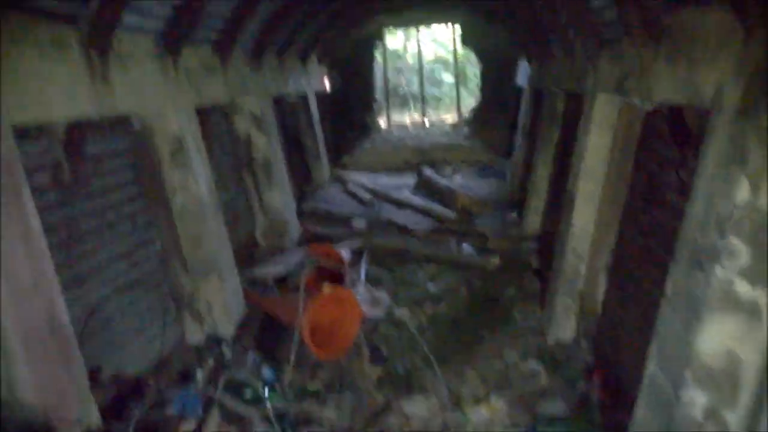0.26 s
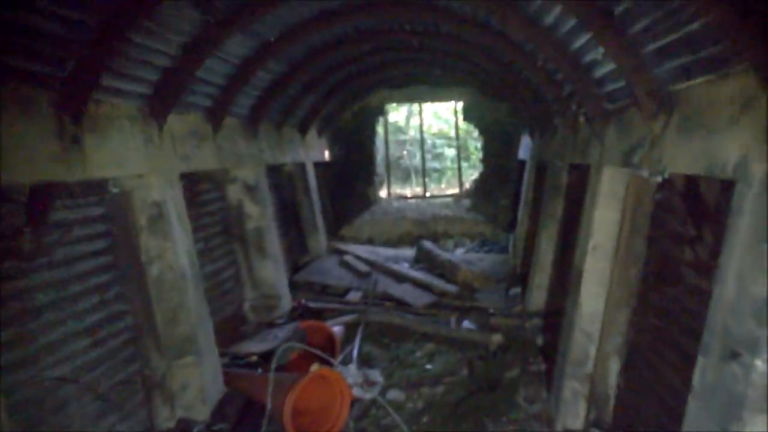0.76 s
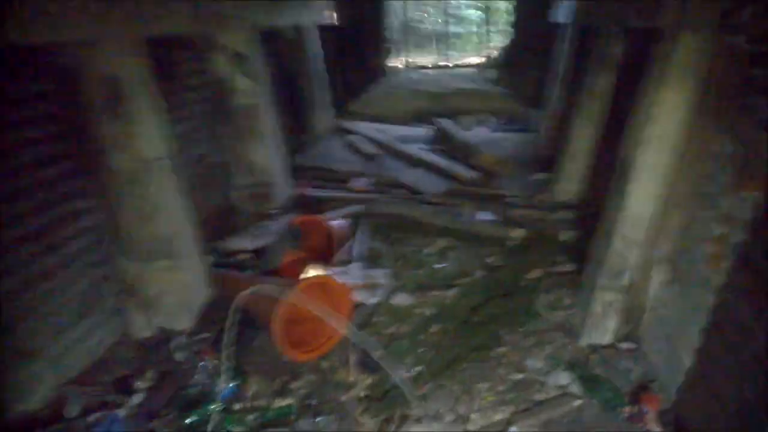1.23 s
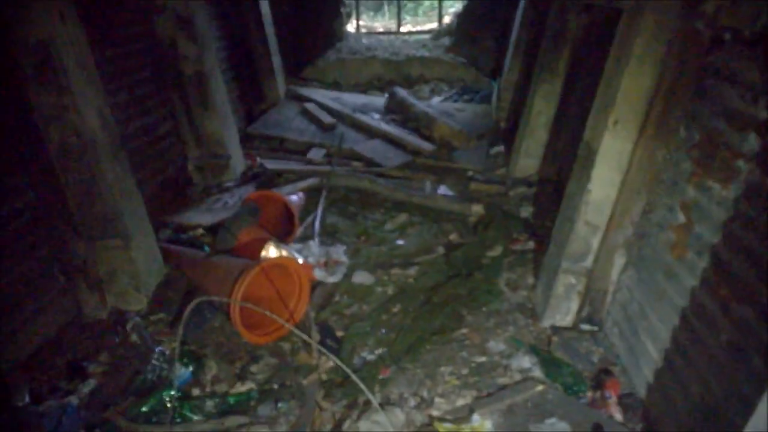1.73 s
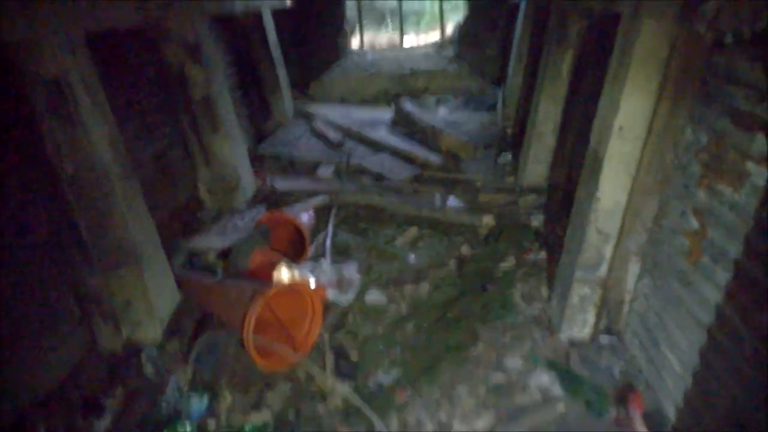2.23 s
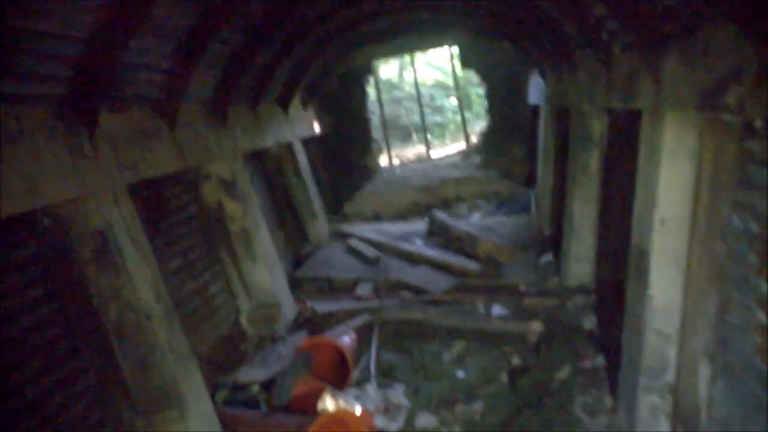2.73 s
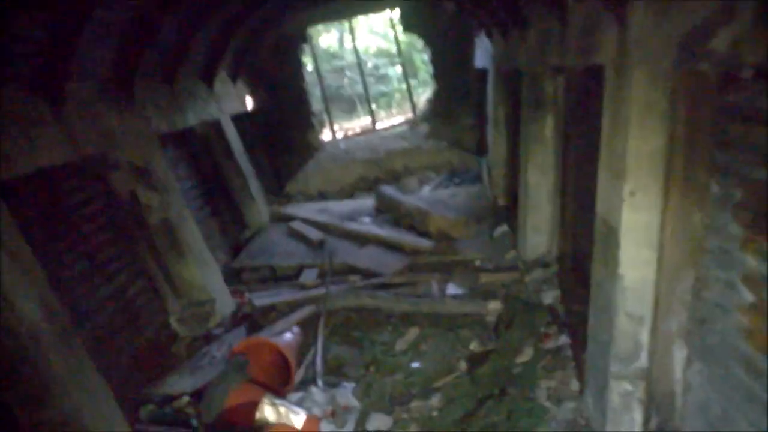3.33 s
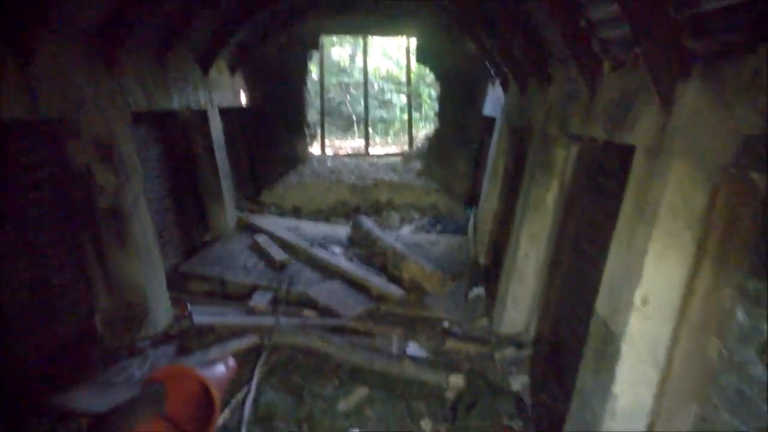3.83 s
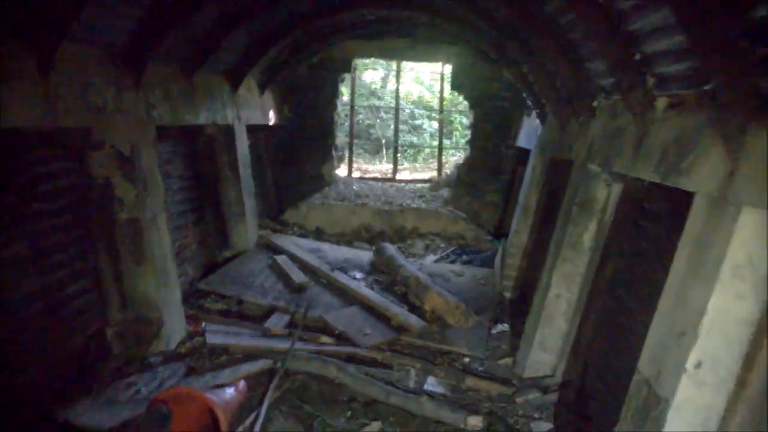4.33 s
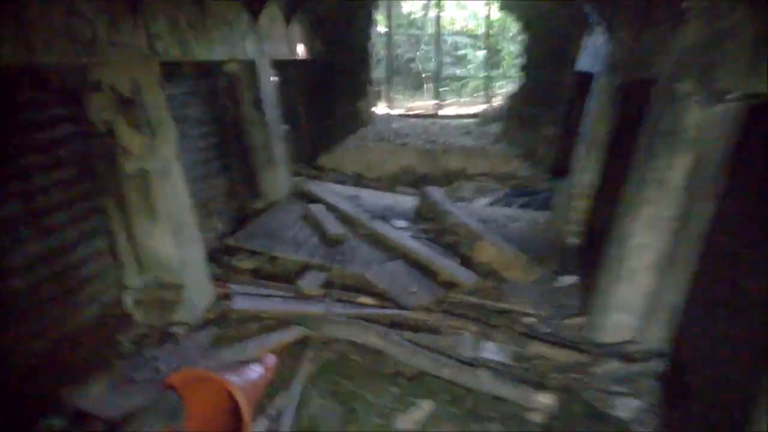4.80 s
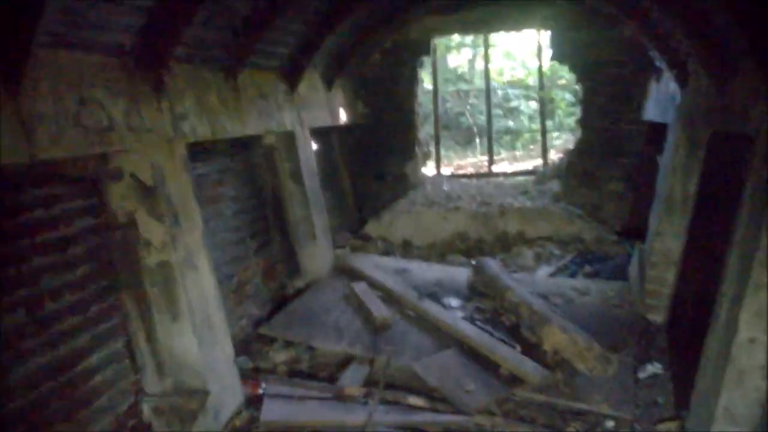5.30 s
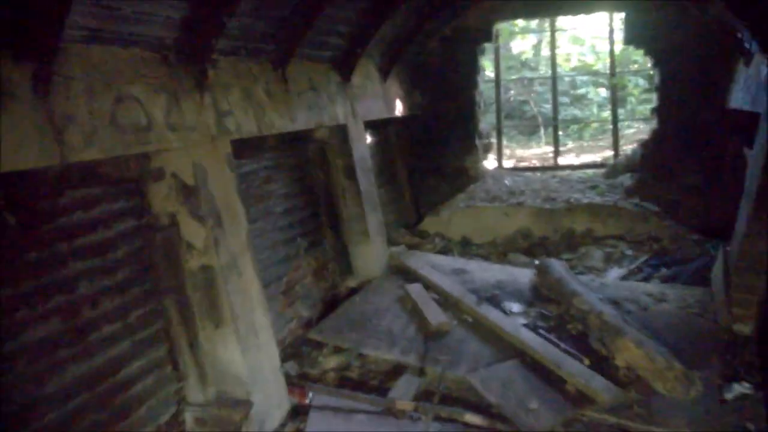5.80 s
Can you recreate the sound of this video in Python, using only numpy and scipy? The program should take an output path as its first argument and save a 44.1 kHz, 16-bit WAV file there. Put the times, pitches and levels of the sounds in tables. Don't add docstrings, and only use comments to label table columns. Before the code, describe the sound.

Close to a hand-held camera, someone walks slowly over broken glass and rubble in a concrete tunnel. A light shift leads to a grinding crunch with snapping shards and knocking stones. After a quiet shuffle comes a duller, stonier crunch, then a loud, bright glass break and a gritty drag. Small pieces settle. Short, scattered echoes follow, over soft air, low rumble and faint hiss.

```python
import sys
import numpy as np
from scipy import signal
from scipy.fft import rfft, irfft, next_fast_len
from scipy.io import wavfile
from scipy.ndimage import uniform_filter1d

SR = 44100
rng = np.random.default_rng(int(sys.argv[2]) if len(sys.argv) > 2 else 0)


def transcribe(signal):
    frames = np.atleast_2d(signal).T
    limited = np.clip(frames, -1, 1)
    pcm = np.round(limited * 32767).astype(np.int16)
    wavfile.write(sys.argv[1], SR, pcm)


def how_loud(loudness_db):
    steps = np.asarray(loudness_db, float) / 20
    return 10 ** steps


N = 266981


def evened(x):
    return x / np.sqrt(np.mean(x ** 2) + 1e-20)


def read(points, hz):
    f, value = np.transpose(points)
    return np.interp(np.log(hz + 1), np.log(f + 1), value)


def add(mix, s, sound):
    part = mix[round(s * SR):][:len(sound)]
    part += sound[:len(part)]


def coloured(spectrum, patchy_db, size):
    frames, hz = 4 * N // size + 5, np.fft.rfftfreq(size, 1 / SR)
    real, imaginary, patches = rng.standard_normal((3, frames, len(hz))).transpose(0, 2, 1)
    patches = uniform_filter1d(patches, size=14, axis=0)
    patches = evened(uniform_filter1d(patches, size=10, axis=1))
    level = how_loud(read(spectrum, hz)[:, None] + patchy_db * patches)
    z = (real + 1j * imaginary) * level
    return evened(signal.istft(z, nperseg=size, noverlap=3 * size // 4)[1][:N])


def background():
    # (f/Hz, level/dB per Hz)
    air_colour = [(65, -14), (110, -25), (217, -19), (256, -2), (386, -27), (533, 2), (594, -9),
                  (1150, -5.5), (8000, -23), (10400, -37), (17600, -120)]
    # (f/Hz, level/dB per Hz)
    rumble_colour = [(7.1, -14), (12, -17), (33, 0), (49, 0.5), (62, -1.5), (76, -12), (88, -5.5),
                     (103, -17), (160, -21), (210, -20), (350, -120)]
    # (t/s, level/dB)
    rumble_level = [(0, -56), (.2, -60), (.45, -57), (1.0, -54), (1.6, -59), (2.7, -60), (3.3, -56),
                    (3.7, -56), (4.2, -59), (4.8, -56), (5.2, -55), (5.6, -56), (6.05, -56)]
    # (f/Hz, level/dB per Hz)
    hiss_colour = [(100, -37), (3000, 12.5), (9000, 2), (12500, 6.5), (16000, 7)]
    s, db = np.transpose(rumble_level)
    rumble = coloured(rumble_colour, patchy_db=1.5, size=4096)
    rumble *= how_loud(np.interp(np.arange(N) / SR, s, db))
    hiss = how_loud(-73) * coloured(hiss_colour, patchy_db=.3, size=512)
    air = how_loud(-71) * coloured(air_colour, patchy_db=1.0, size=512)
    return rumble + hiss + air


def vault(sends):
    # (f/Hz, time to fall 60 dB/s)
    echo_time = [(150, 1), (500, 0.19), (2000, 0.12), (5000, 0.28), (15000, 0.16)]
    rise_s, open_s = .014, .052
    taps = np.zeros((len(sends), SR // 2))
    grid = np.arange(60, SR // 2 - 8, 8)
    at = grid + rng.integers(0, 8, (len(sends), len(grid)))
    np.put_along_axis(taps, at, rng.choice([-1., 1.], at.shape), 1)
    hz, t, z = signal.stft(taps, SR, nperseg=128)
    fall_db = -60 * t / read(echo_time, hz)[:, None]
    tail = signal.istft(z * how_loud(fall_db), SR, nperseg=128)[1]
    t = np.arange(tail.shape[1]) / SR
    tail *= .4 + 1 - np.exp(-(t / rise_s) ** 2)
    tail *= 0.73 + np.exp(-(t / open_s) ** 3)
    tail /= np.linalg.norm(tail, axis=1, keepdims=True)
    return signal.fftconvolve(sends, tail, axes=1)[:, :N].sum(0)


def rings(hz, t60, modes, rise_s):
    t = np.arange(int(np.clip(1.3 * t60, .006, .12) * SR)) / SR
    out = np.zeros(len(t))
    for (ratio, db), phase in zip(modes, rng.random(len(modes))):
        fade = how_loud(db - 60 * t * np.sqrt(ratio) / max(t60, .002))
        out += fade * np.sin(2 * np.pi * (min(hz * ratio, .4 * SR) * t + phase))
    out *= 1 - np.exp(-(t / rise_s) ** 1.6)
    return out / abs(out).max()


def snap(db, hz, crack_db):
    # (ratio to its main note, level/dB)
    shard_notes = [(1.0, 0.0), (1.3, -4.0), (1.75, -13.0), (.76, -5.0)]
    ring = rings(hz, 9.4 / hz, shard_notes, 0.00022)
    t = np.arange(232) / SR
    burst = rfft((rng.random(232) - .5) * np.exp(-t / .0006))
    even_burst = irfft(burst / abs(burst))
    crack = signal.lfilter([1, -.7], [1], even_burst) * np.exp(-t / 0.02)
    ring[:len(crack)] += how_loud(crack_db + 11.5) * crack / abs(crack).max()
    return how_loud(db) * ring / abs(ring).max()


def load(steps):
    # (peak t/s, level/dB at fineness step 0, rise/s, fall/s,
    # fineness/dB per step)
    sole_loads = [(0.832, -41.5, 0.061, 0.13, 0), (.895, -46.5, 0.072, 0.059, -1),
                  (0.966, -60, 0.0052, 0.35, -2), (1.028, -43, 0.081, 0.097, -1.5),
                  (1.114, -37.5, 0.055, 0.16, -2.5), (1.193, -34, 0.046, 0.1, 0.5),
                  (1.235, -36.5, 0.059, 0.098, 0.5), (1.289, -44.5, 0.067, 0.14, -7),
                  (1.356, -61.5, 0.06, 1, -3), (2.804, -50.5, 0.0046, 0.093, 0),
                  (3.345, -45.5, 0.12, 0.094, 0.5), (3.43, -49.5, 0.068, 0.24, 0),
                  (3.552, -37.5, 0.064, 0.1, -1.5), (3.579, -34, 0.0068, 0.099, -1),
                  (3.64, -51, 0.033, 0.046, 0), (4.446, -46, 0.038, .05, -5.5), (4.464, -43, 0.011, 0.11, 0),
                  (4.611, -39, 0.015, 0.1, -5.5), (4.644, -35, 0.031, 0.07, 0.5),
                  (4.671, -32, 0.0057, 0.085, 0), (4.861, -42, 0.0069, 0.15, 0), (4.892, -42, .015, 0.2, 0.5),
                  (5.2105, -44, 0.0018, 0.08, 4), (5.222, -54, 0.025, 0.09, 5.5),
                  (.03, -56.5, 0.98, 0.26, -6), (.224, -61, 0.12, 0.56, -1.5), (.366, -59, 0.28, 0.49, -1.5),
                (.538, -65.5, 0.0047, 0.15, -3), (.72, -60, 0.3, 0.082, -1.5),
                (1.58, -70, 0.18, 0.079, 0.5), (1.781, -51, 0.0052, 0.033, -4),
                (1.906, -50.5, 0.048, 0.033, -2), (2.066, -64.5, 0.013, 0.097, 1),
                (2.34, -61, 0.24, 0.035, -3.5), (2.53, -58.5, 0.062, 0.048, 0.5), (2.65, -64, .01, 0.12, 1),
                (2.739, -61, 0.0098, 0.025, 1), (3.862, -60.5, 0.083, 0.061, -0.5),
                (4.122, -55, 0.1, 0.036, -2), (4.2, -62.5, 0.056, 0.99, -1),
                (4.4, -58.5, 0.073, 0.075, -0.5), (5.18, -62, 0.052, 0.064, 0.5),
                (2.055, -65, 0.052, .01, -0.5), (5.382, -72, 0.016, 0.18, -24),
                (5.439, -49.5, 0.1, 0.09, -4), (5.475, -61, 0.069, 0.023, 2),
                (5.545, -62, 0.049, 0.063, 4.5), (5.638, -54.5, 0.1, 0.014, -2),
                (5.855, -55, 0.34, 0.25, -4.5), (5.899, -59.5, 0.055, 0.14, 2.5),
                  (2.456, -61, 0.18, 0.2, -0.5),
        (2.958, -47, 0.054, 0.3, 0.5),
        (3.06, -48.5, 0.57, 0.21, -1),
        (3.27, -47, 0.24, 1, -1),
        (4.983, -38, 0.25, 0.17, -1),
        (5.071, -60, 0.07, 0.089, 4.5),
    ]
    s, db, rise, fall, fine = np.transpose(sole_loads)[:, :, None]
    t = np.arange(0, N / SR + .002, .001)
    away = abs(t - s) / np.maximum(np.where(t < s, rise, fall), .002)
    rubble_loss_db = (steps < 0) * 1.5 * np.maximum(fine, 0)
    each_db = db + steps * fine - rubble_loss_db - 25.5 * away ** 0.99
    level = np.sqrt((how_loud(each_db) ** 2).sum(0))
    return np.interp(np.arange(N) / SR, t, level)


def resonate(x, hz, width):
    turn = np.exp(2j * np.pi * np.cumsum(hz) / SR)
    r = np.exp(-np.pi * width / SR)
    return 2 * (turn * signal.lfilter([1 - r], [1, -r], x / turn)).real


def skids():
    # (start t/s, length/s, level/dB, first f/Hz, last f/Hz)
    slides = [(0.868, 0.063, -57, 2100, 2300), (0.964, 0.085, -57, 2400, 2200),
              (1.018, 0.19, -50, 2090, 2290), (1.04, 0.038, -56, 4600, 4800),
              (1.096, 0.035, -44.5, 1300, 1390), (1.26, 0.056, -56, 11000, 9000),
              (1.294, 0.044, -51.5, 3240, 3280), (1.566, 0.074, -67, 5000, 3500),
              (1.78, 0.052, -65, 480, 480), (1.893, 0.095, -60, 1700, 1800), (1.89, 0.052, -57, 3600, 3400),
              (2.066, 0.062, -61.5, 2000, 2000), (2.439, 0.2, -61, 1110, 1120),
              (2.82, 0.043, -57, 3400, 3800), (2.814, 0.048, -54, 1090, 1000),
              (2.912, 0.06, -53.5, 4300, 4000), (2.96, 0.028, -67, 1900, 1900),
              (2.994, 0.046, -48, 1660, 1490), (3.325, 0.057, -49, 4020, 3750),
              (3.382, 0.093, -41.5, 242, 240), (3.847, 0.046, -58, 980, 1290),
              (4.097, 0.041, -52.5, 1920, 4100), (4.332, 0.018, -53.5, 800, 700),
              (4.374, 0.085, -57, 860, 750), (4.665, 0.084, -37.5, 3400, 3130),
              (4.683, 0.12, -50, 2310, 2360), (4.726, 0.053, -48, 900, 900),
              (4.841, 0.023, -55, 4500, 5500), (5.242, 0.056, -47.5, 7000, 5500),
              (5.382, 0.062, -62, 900, 695), (5.53, 0.15, -61.5, 990, 1000),
              (5.531, 0.045, -67, 3100, 3200), (5.623, 0.048, -52, 3860, 3870),
              (5.739, 0.094, -66, 2620, 2600), (5.786, 0.11, -55.5, 885, 950),
              (5.825, 0.073, -55.5, 1930, 2930), (5.89, 0.052, -49.5, 306, 304),
              (5.894, .05, -69, 2190, 2200), (.22, 0.34, -66.5, 1500, 2200),
              (2.296, 0.074, -62, 1100, 1100)]
    out = np.zeros(N)
    for s, length, db, first_hz, last_hz in slides:
        u = np.linspace(0, 1, int(np.clip(length * SR, 200, SR // 4)))
        draw, size, sign = rng.random((3, len(u)))
        struck = draw < 3000 / SR
        scratches = struck * how_loud(-5 * np.log(size + 0.013)) * np.sign(sign - .5)
        hz = first_hz * (last_hz / first_hz) ** u
        width = 0.51 * hz.mean()
        colour = evened(resonate(resonate(scratches, hz, width), hz, width))
        swell = np.sin(np.pi * u ** 0.93) ** .5
        add(out, s, colour * swell * how_loud(db - 12.5 * u ** 2))
    return out


def chips():
    # (t/s, peak level/dB, ring f/Hz, crack level/dB re peak)
    splits = [(.8007, -46, 1010, -18), (.829, -35, 3030, -9), (0.835, -38, 2000, -6),
              (1.0916, -38, 2460, -23), (1.1037, -29.5, 1190, -24), (1.213, -44.5, 3620, -20.5),
              (2.8147, -44, 1480, -8), (2.915, -51, 2000, -12), (2.9978, -49, 1780, -20),
              (3.269, -37, 1020, -25), (3.3285, -42, 4000, -9), (3.421, -45, 1510, -18),
              (3.595, -33, 910, -17), (4.3696, -46, 1314, -20), (4.845, -40, 2390, -24),
              (4.891, -28, 2270, -20), (5.211, -36, 2920, -3), (5.45, -39, 4970, -10),
              (3.852, -46, 1000, -20)]
    out = np.zeros(N)
    for s, db, hz, crack_db in splits:
        add(out, s, snap(db, hz, crack_db))
    return out


def slivers():
    # lowest f/Hz, highest f/Hz, cycles to die 60 dB, level/dB re load, size spread/dB
    lo_hz, hi_hz, cycles, share_db, spread_db = (1505, 9998, 86, -7.5, 1.5)
    when, note, size = rng.random((3000, 3)).T[:, :, None]
    at, t = (when * N).astype(int), np.arange(800) / SR
    hz = lo_hz * (hi_hz / lo_hz) ** note
    fade = how_loud(share_db - spread_db * np.log(size + 0.017) - 60 * t * hz / cycles)
    ring = load(steps=1)[at] * fade * np.sin(2 * np.pi * hz * t)
    return np.bincount((at + np.arange(len(t))).ravel(), ring.ravel(), N)[:N]


def loose():
    out = skids() + chips() + slivers()
    return out + how_loud(-15) * vault(out[None])


def fragments():
    # (t/s, peak level/dB, f/Hz, cycles to die 60 dB)
    pieces = [(.842, -45, 2000, 25), (.869, -49, 2100, 30), (1.000, -44, 2120, 40), (1.016, -40, 4760, 44),
              (1.144, -42, 4300, 60), (1.211, -33, 4480, 117), (1.221, -40, 4450, 100),
              (1.237, -32, 3200, 70), (1.284, -44, 4420, 60), (1.906, -41, 2460, 22),
              (2.078, -50, 3700, 70), (2.086, -55, 3750, 70), (2.735, -50, 3200, 25),
              (2.737, -59, 6500, 60), (2.925, -42, 1080, 20), (2.963, -45, 4480, 50),
              (2.965, -42.5, 340, 19), (3.068, -47, 463, 12), (3.268, -31, 524, 5), (3.316, -38, 527, 20),
              (3.556, -39, 2440, 30), (3.582, -26, 382, 7), (3.593, -30, 400, 5), (3.607, -35, 296, 5),
              (3.789, -49, 11600, 198), (3.804, -56, 574, 11), (4.378, -46.5, 340, 12),
              (4.466, -38.5, 1070, 33), (4.488, -43, 3620, 40), (4.611, -22.5, 713, 10),
              (4.645, -32, 6270, 55), (4.667, -24.5, 6700, 30), (4.667, -21.5, 4380, 15),
              (4.677, -28, 3250, 50), (4.711, -37, 390, 18), (4.73, -39, 3270, 50), (4.867, -34, 4820, 40),
              (4.890, -30, 2380, 15), (4.919, -43, 4820, 50), (4.96, -41, 540, 14), (4.995, -40.5, 460, 14),
              (5.015, -35, 1380, 25), (5.072, -40, 4700, 80), (5.208, -36, 2700, 20),
              (5.213, -36, 13400, 80), (5.219, -28, 13500, 100), (5.268, -46, 7440, 70),
              (5.447, -49, 1000, 8), (5.638, -42, 3930, 70), (5.826, -45, 900, 17)]
    out = np.zeros(N)
    for s, db, hz, cycles in pieces:
        add(out, s, how_loud(db) * rings(hz, cycles / hz, [(1.0, 2.5), (1.04, -4)], 0.82 / hz))
    return out + how_loud(-11.5) * vault(out[None])


def clinks():
    # (t/s, peak level/dB, f/Hz, time to fall 60 dB/s, vault level/dB)
    large_pieces = [(1.187, -26.5, 4480, 0.049, -2), (1.194, -24.5, 7190, 0.062, -13),
                    (1.205, -34, 3217, 0.045, 7.5), (1.8961, -51, 2480, 0.0071, 18),
                    (2.47, -55, 1020, 0.047, 1), (2.8, -54, 128, 0.093, -27), (3.3506, -40, 135, 0.02, 2),
                    (3.356, -28.5, 603, 0.026, -29), (4.5961, -41.5, 678, 0.058, 6),
                    (4.6085, -27.5, 712, 0.02, 3.5), (4.667, -22.5, 2143, 0.027, 0),
                    (4.67, -47.5, 104, 0.055, 0.5), (4.690, -31, 2326, 0.049, 0),
                    (4.777, -54, 3150, 0.052, -17), (4.860, -29.5, 2328, 0.054, 4),
                    (4.888, -33, 2303, 0.042, -21), (4.903, -41, 3570, 0.041, -16),
                    (5.427, -49, 2380, 0.017, 9), (5.808, -56, 895, .06, 3), (5.8221, -46, 860, 0.034, 0.5),
                    (5.884, -58.5, 193, 0.018, 11)]
    # (ratio to its main note, level/dB)
    piece_notes = [(1.0, 0.0), (1.07, -7.0), (2.75, -22.0)]
    return [(s, how_loud(db) * rings(hz, t60, piece_notes, 1.1 / hz), vault_db)
            for s, db, hz, t60, vault_db in large_pieces]


def knocks():
    # (t/s, peak level/dB, f/Hz, vault level/dB)
    stones = [(0.68, -53, 510, -12), (0.785, -43, 432, 2.5), (0.801, -34, 485, -0.5), (0.959, -39, 600, 3),
              (1.014, -35.5, 483, 1.5), (1.099, -33, 494, -5), (1.117, -38.5, 486, 9),
              (1.24, -36.5, 517, 5), (1.781, -55, 360, -14), (1.893, -55, 514, -17),
              (2.815, -44.5, 514, -6), (3.251, -33.5, 580, 0), (3.263, -31.5, 276, 3.5),
              (3.2959, -24, 550, -11), (3.353, -26.5, 1133, -4), (3.42, -23, 563, -2.5),
              (3.517, -35, 628, -2), (3.5485, -33.5, 590, 5.5), (3.578, -20.5, 339, -11.5),
              (3.609, -33, 293, -15), (3.849, -49, 969, 2), (4.3296, -44.5, 470, -1), (4.371, -50, 575, 7),
              (4.461, -32.5, 538, -2), (4.886, -29.5, 716, -17), (5.2053, -30.5, 1200, -5),
              (5.382, -53, 1010, -21), (5.404, -52, 510, -1), (5.528, -46.5, 860, -6),
              (5.621, -42.5, 1000, 0.5)]
    # (ratio to its main note, level/dB)
    stone_notes = [(1.0, 0.0), (.7, -9.0), (1.5, -9.0), (2.3, -14.0)]
    t60_s, rise_s = .014, .003
    return [(s, how_loud(db) * rings(hz, t60_s, stone_notes, rise_s), vault_db)
            for s, db, hz, vault_db in stones]


def snaps():
    # (t/s, peak level/dB, ring f/Hz, crack level/dB re peak, vault level/dB)
    shards = [(0.8129, -30.5, 1930, -2, 12), (0.9591, -34, 1760, -25, 9), (1.0956, -32, 1500, -29, 10.5),
              (1.7806, -49, 1620, -19, -3), (1.888, -41, 2100, -21, 10), (2.524, -49.5, 1880, -25, 10),
              (2.8998, -46.5, 1620, -31, 16.5), (2.95, -36.5, 1810, 7, 15), (3.2215, -39, 1140, -14, 13.5),
              (3.265, -28, 1280, -18, 3), (3.297, -36.5, 1380, -12, 10.5), (3.355, -30, 1480, -28, 5),
              (3.548, -29, 1200, -11, 5.5), (3.5793, -19, 1530, -19, 5), (4.1006, -42, 1830, -30, 5),
              (4.4436, -34.5, 1290, -32, 8), (4.4642, -37, 1660, -14, 16), (4.636, -20, 2250, -25, -11),
              (4.6668, -11.5, 2670, -24, -11), (4.86, -28, 2650, -37, 6.5), (4.887, -33, 2150, -27, -1),
              (4.978, -30, 1590, 0, 14), (5.407, -48, 1210, -6, -6), (5.443, -40.5, 2090, -5, 9.5)]
    # (t/s, peak level/dB, ring f/Hz, crack level/dB re peak, vault level/dB)
    splinters = [(1.0157, -32, 2100, -14, 7), (1.052, -37.5, 3240, -31, 9), (1.127, -28.5, 4100, -2, 10.5),
                 (1.1767, -27.5, 4440, -27, 9.5), (1.195, -30, 5600, -25, -1), (2.065, -39, 3270, -30, 1),
                 (2.435, -46, 3500, -4, -5), (2.645, -54, 4900, -19, 4), (2.733, -60.5, 4600, -34.5, 21),
                 (2.801, -43, 2920, 4, 9), (3.788, -41, 6300, -2, -1), (4.124, -43.5, 3330, -41, 7.5),
                 (4.62, -32, 5530, -30, 7), (4.672, -12.5, 3300, -21, -7),
                 (4.953, -31.5, 7600, -12.5, 10.5), (5.207, -17.5, 4960, 0, 4), (5.53, -37, 4820, -9, 11.5),
                 (5.6223, -35.5, 2283, -22, 5), (5.624, -51, 4000, -24, 5)]
    return [(s, snap(db, hz, crack_db), vault_db)
            for s, db, hz, crack_db, vault_db in [*shards, *splinters]]


def hits():
    direct, sends = np.zeros(N), np.zeros((4, N))
    for k, (s, sound, vault_db) in enumerate(snaps() + knocks() + clinks()):
        add(direct, s, sound)
        add(sends[k % 4], s, how_loud(vault_db) * sound)
    return direct, sends


def grind():
    # (lowest f/Hz, highest f/Hz, cycles, grains per s, size spread/dB, vault level/dB)
    grains = [
        (882, 2410, 3.34, 1200, 1, -2),
        (283, 990, 1.73, 500, 2, -5.5),
        (2560, 5330, 2.2, 5700, -1.5, -10.5),
        (6160, 14630, 15.5, 9700, -3, -28),
    ]
    # (fineness step, level/dB re load)
    sizes = [
        (1.5, -0.5),
        (0.07, 0.5),
        (2.12, -0.5),
        (3.5, -0.5),
    ]
    direct, send = np.zeros(N), np.zeros(N)
    span = round(.03 * SR)
    clumps = uniform_filter1d(uniform_filter1d(rng.standard_normal(N), span), span)
    clumps = how_loud(2.0 * evened(clumps))
    for (lo_hz, hi_hz, cycles, per_s, spread_db, vault_db), (steps, share_db) in zip(grains, sizes):
        struck, kind = rng.random(N) < per_s / SR, rng.integers(0, 12, N)
        size = how_loud(spread_db * np.minimum(rng.exponential(1, N), 4))
        size = size * struck * rng.choice([-1, 1], N)
        crowd = np.zeros(N)
        for n, hz in enumerate(np.geomspace(lo_hz, hi_hz, 12)):
            u = np.arange(int(12 * SR / lo_hz)) * hz / SR
            grain = np.sin(2 * np.pi * u) * (u / cycles) * np.exp(-4.0 * u / cycles)
            crowd += signal.oaconvolve(size * (kind == n), grain / np.linalg.norm(grain))[:N]
        crowd = evened(crowd) * clumps * load(steps) * how_loud(share_db - 4.5)
        direct += crowd
        send += crowd * how_loud(vault_db)
    return direct, send


def scene():
    # (f/Hz, level/dB)
    ground_colour = [(110, -3), (220, -4), (320, 0), (7500, 0), (9600, -4), (12500, -2), (16000, -4)]
    far = background()
    ground, send = grind()
    struck, sends = hits()
    sends[0] += send
    feet = ground + struck + vault(sends) + loose() + fragments()
    size = next_fast_len(N)
    spectrum = rfft(feet, size) * how_loud(read(ground_colour, np.fft.rfftfreq(size, 1 / SR)))
    return (irfft(spectrum, size)[:N] + far)[None]


def band_limit(x):
    return signal.sosfilt(signal.butter(12, 16830, fs=SR, output="sos"), x)


def record(dry):
    lowpass = signal.firwin(1535, 15800, window=("kaiser", 9), fs=SR)
    limited = signal.oaconvolve(dry, lowpass[None], "same")
    return band_limit(limited)


dry = scene()
out = record(dry)
transcribe(out)
```